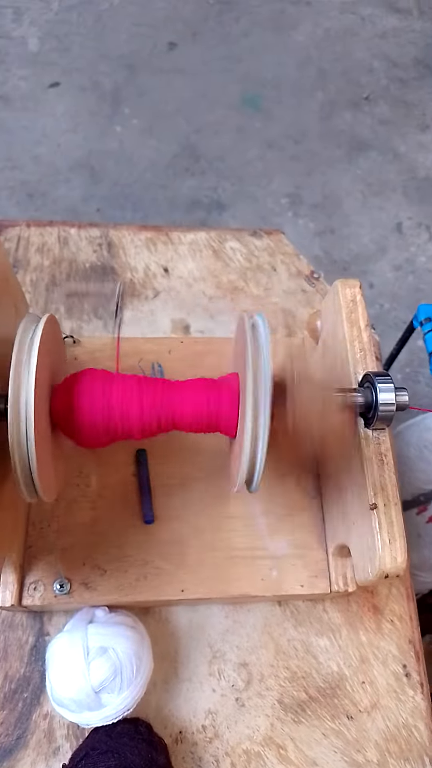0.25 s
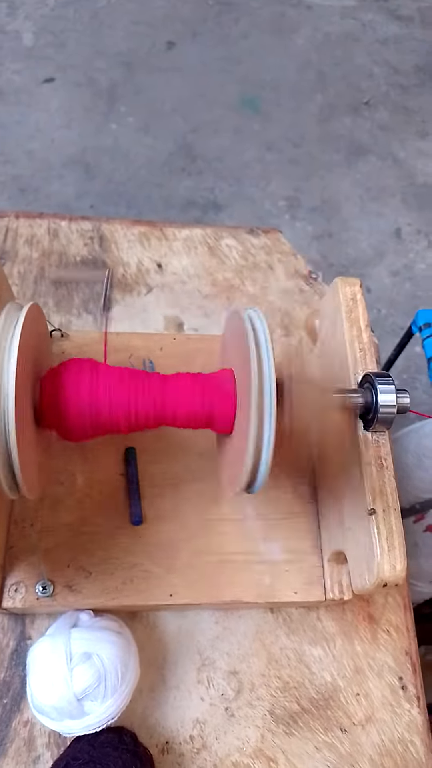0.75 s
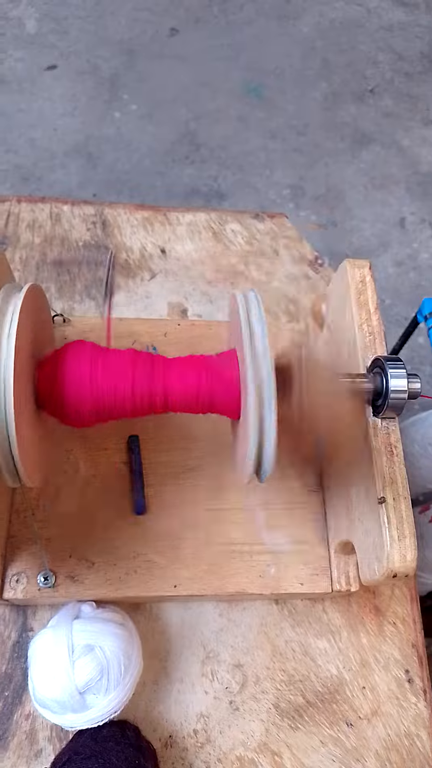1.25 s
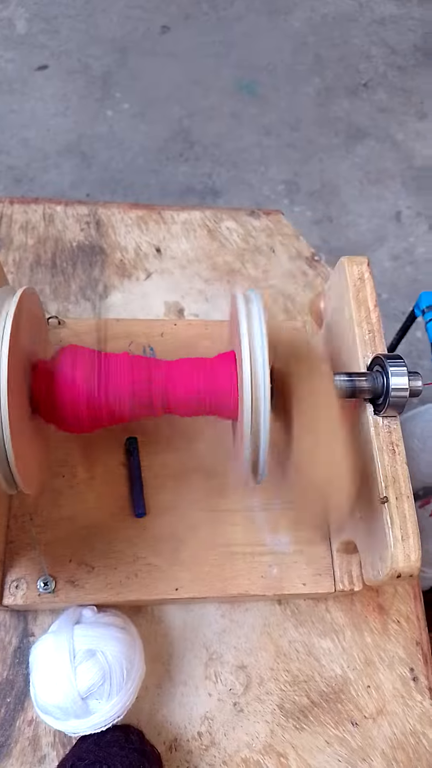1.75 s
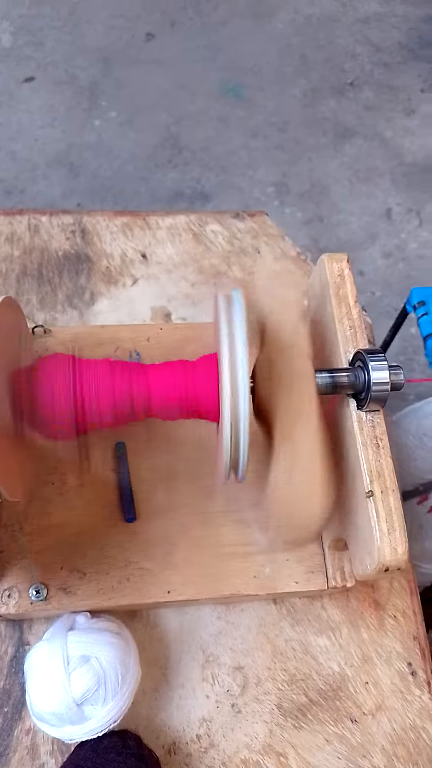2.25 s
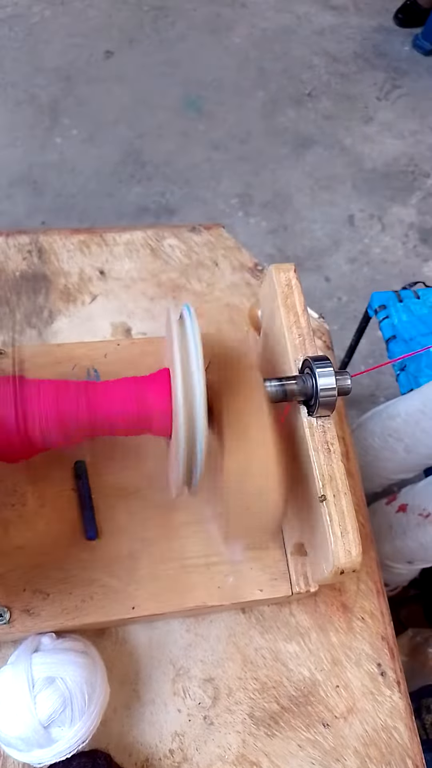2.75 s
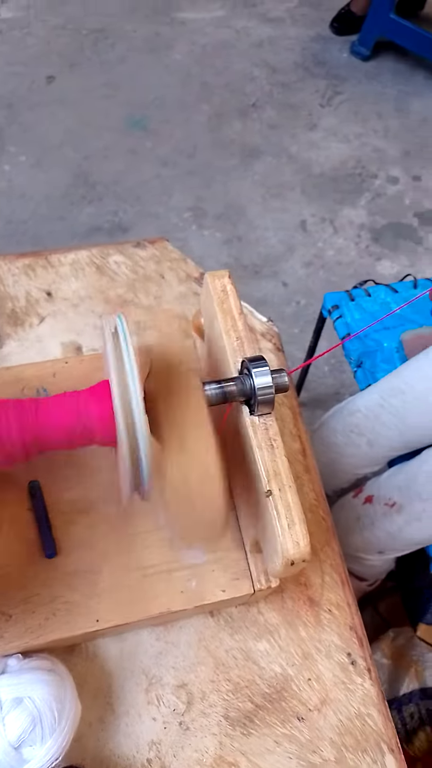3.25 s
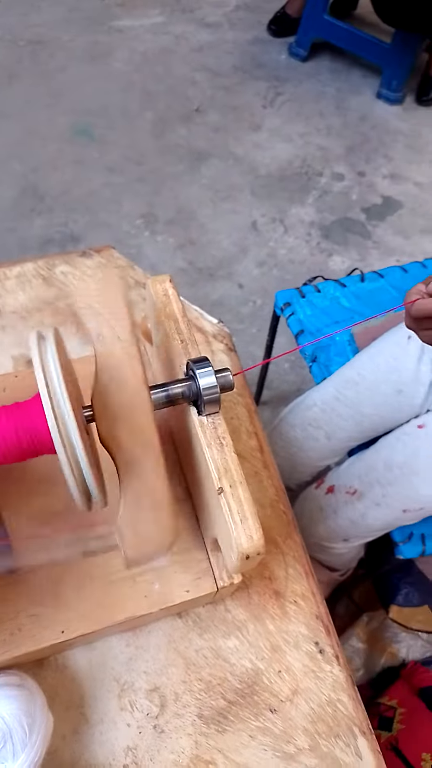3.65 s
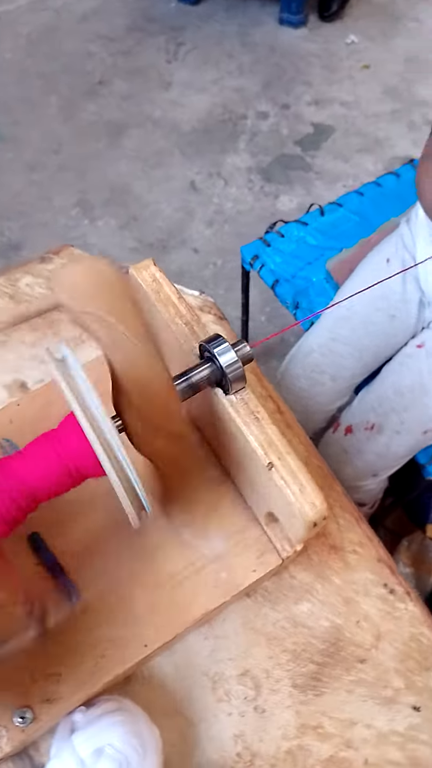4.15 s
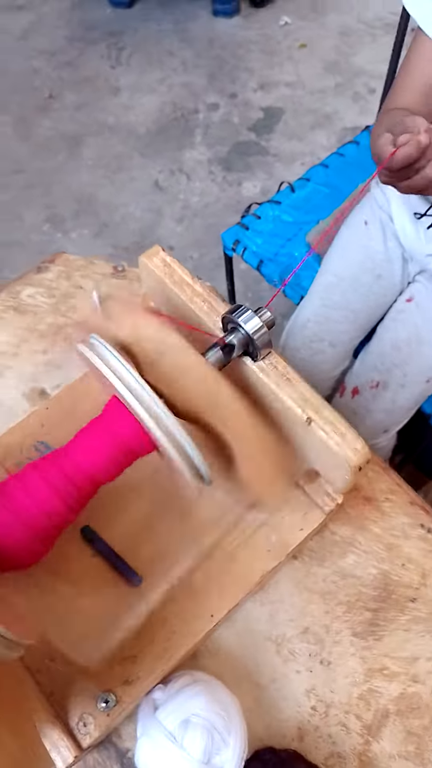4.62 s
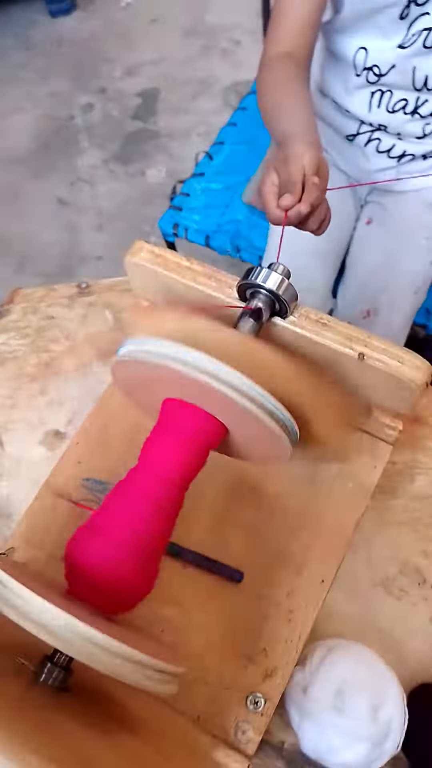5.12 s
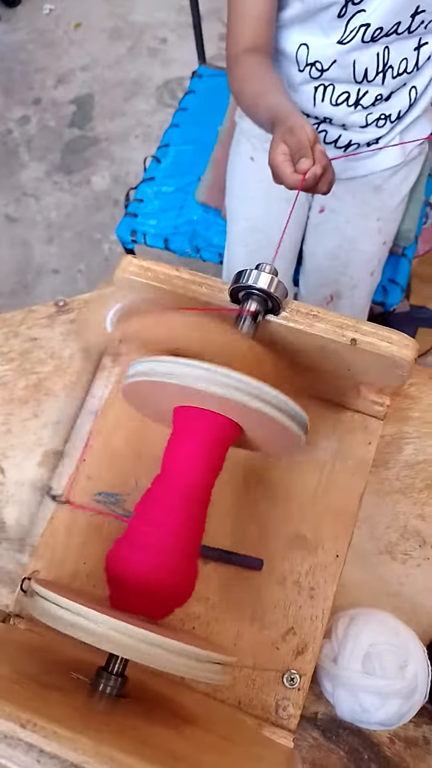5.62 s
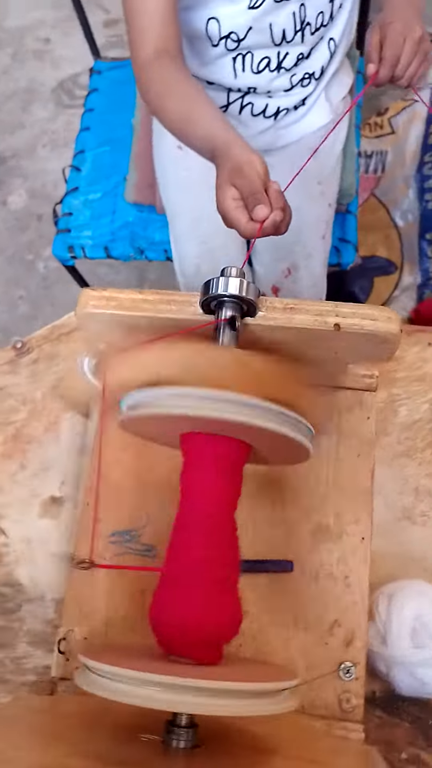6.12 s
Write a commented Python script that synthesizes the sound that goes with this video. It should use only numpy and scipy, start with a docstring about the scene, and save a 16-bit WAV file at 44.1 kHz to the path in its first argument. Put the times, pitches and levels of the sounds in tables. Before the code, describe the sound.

Continuous close whirring from a motorised yarn spinner: a nasal, rattling whine flutters rapidly in pitch, squealing near two kilohertz on each slowdown. Sharp brush hiss opens with a tiny flare and later becomes more prominent as the microphone swings round from above to the end. Irregular clicks from the turning wooden flyer and a low table rumble sit underneath. Dry, little room sound, cut off while still running.

```python
"""A motor whine slides down again and again and catches into squeals, over hiss that opens with a short flare.
A small brush motor drives the wooden flyer of a yarn spinner on a table: commutator and poles ring the frame.
An uneven belt and the unbalanced flyer and bobbin drag the motor down, moving the whine through resonances.
Brushes hiss, the flyer ticks and the table top rumbles as shaped noise.
The microphone moves from above the bobbin round to its end."""
import sys
import numpy as np
from scipy import signal
from scipy.fft import rfft, irfft, next_fast_len
from scipy.io import wavfile
from scipy.ndimage import uniform_filter1d, map_coordinates

SR = 44100
rng = np.random.default_rng(int(sys.argv[2]) if len(sys.argv) > 2 else 0)


def file_out(sig):
    """Save sig as 16-bit WAV at sys.argv[1]."""
    # one column per channel
    cols = np.atleast_2d(sig).T
    # limit, then scale
    lim = np.clip(cols, -1, 1)
    pcm = np.round(lim * 32767).astype(np.int16)
    wavfile.write(sys.argv[1], SR, pcm)


N = 281358
TIME = np.arange(N) / SR  # s

# harmonics of the shaft rate: ten commutator bars give multiples of ten, the two poles their neighbours
# column: f/shaft rate
MULTIPLES = [14, 16, 18, 20, 22, 24, 30, 50, 52]
# relative levels of those harmonics before load and frame act on them; column: level/dB
WHINE_DB = [-13, -18, -5, 0, -15, -17, -14, -8, -14]


def motor(turns, speed, place, bite, end_rattle_db=3, pole_db=-2.0, bite_db=6, calm_db=4,
          linger=0.0077, surge_db=0.44, brake_db=0.8, end_pulley_db=4.5):
    """Forced vibration: bar harmonics and pole-pulsed rattle ring the frame; load clears the whine."""
    load = np.interp(TIME - linger, TIME, bite) / bite.max()
    loose = amp(-calm_db * load)
    pressed_db = bite_db * load + surge_db * surge(speed) + brake_db * unit(braking(speed))
    # the pulley's swell is heard from the side
    pressed_db += end_pulley_db * np.minimum(place, 1) * pulley(peak_s=0.049)
    pressed = amp(pressed_db)

    whine = np.zeros(N)
    for multiple, db in zip(MULTIPLES, WHINE_DB):
        unsteady_level = 1 + .14 * wobble(150)
        phase = 2 * np.pi * multiple * turns + .08 * wobble(120)
        # load strengthens the bar harmonics and calms the pole neighbours
        grip = loose if multiple % 10 else pressed
        whine += np.sqrt(2) * amp(db) * unsteady_level * np.sin(phase) * grip

    pole_pulse_db = pole_db * np.cos(4 * np.pi * turns)
    rattle = unit(rng.standard_normal(N) * amp(pole_pulse_db + 2.64 * wobble(300)))
    rattle_gain = amp(15.5 + end_rattle_db * place / 2) * np.sqrt(loose)
    drive = whine + rattle_gain * rattle
    return blend([unit(coloured(drive, frame(side))) for side in (0, 1, 2)], place)


# resonances of motor case and wooden frame, with relative peak levels before the bass cut
# columns: f/Hz, width/Hz, level from above/dB, level oblique/dB, level from the end/dB
FRAME = [(557, 62, -7.5, -10, -13), (906, 207, -10.5, -10, -8.5), (1128, 39, 0, 3.5, -2),
         (1184.6, 78.6, 6, -2.5, -30), (1381, 155, -6.5, 0.5, -3), (1572, 63, -20, -3, -3),
         (1804, 174, -7.5, -9.5, -5), (2560, 1070, -15.5, -13.5, -16.5), (3010, 260, -9.5, -19.5, -11),
         (3273, 250, -32, -6.5, -0.5), (3490, 240, -7, -19, -6.5), (3977, 225, -14, -14, -11.5)]


def frame(column, low_hz=300):
    """Modal resonance: summed peaks heard from one side, on a body too small to radiate bass."""
    def gain(hz):
        power = 0
        for centre, width, *dbs in FRAME:
            offset = (hz - centre) / width
            power = power + amp(2 * dbs[column]) / (1 + 2 * offset ** 2) ** 2
        bass_cut = hz ** 2 / (hz ** 2 + low_hz ** 2)
        return np.sqrt(power) * bass_cut
    return gain


# unbalanced bobbin and flyer (second row: flyer); their unequal rates make the drags beat
# columns: f/Hz (turns a second), speed sag/(rev/s), t/s when the heavy side is up
ROTORS = [(12.07, 1.06, 0.039), (11.93, 1.031, 0.024)]
# places where the uneven belt binds, seven to a lap
# columns: position/lap, speed sag before the lap mean is removed/(rev/s)
TIGHT_SPOTS = [(0.046, 6.134), (0.197, 8.238), (0.341, 6.29), (0.45, 8.86), (0.591, 7.01), (0.738, 6.26),
               (0.901, 3.476)]
BELT_HZ, BIND_S = 2.504, 0.01966  # laps a second; Gaussian half-width of each bind
# cruising speed of the motor as the pull on the yarn changes; columns: t/s, speed/(rev/s)
CRUISE = [(0.0, 63.3), (0.37, 65.0), (0.5, 63.7), (0.9, 64.8), (1.22, 63.4), (1.96, 63.1), (2.17, 64.7),
          (2.87, 63.9), (3.01, 62.7), (3.22, 66.2), (3.8, 61.7), (4.38, 65.9), (4.61, 64.0), (4.65, 64.0),
          (5.39, 61.8), (5.69, 65.7), (6.05, 62.8), (6.38, 63.4)]
FLUTTER_REV_S, FLUTTER_RATE = .5, 25  # chance unevenness: scale in rev/s, knots a second


def shaft_speed():
    """Load torque lowers shaft speed: rev/s less the drag of tight spots, flyer and bobbin."""
    cruise, = curves(CRUISE)
    belt = np.zeros(N)
    for share, sag in TIGHT_SPOTS:
        # time to the nearest pass of this spot
        away_s = ((TIME * BELT_HZ - share + .5) % 1 - .5) / BELT_HZ
        belt += sag * np.exp(-.5 * (away_s / BIND_S) ** 2)
    unbalance = sum(sag * np.cos(2 * np.pi * hz * (TIME - s)) for hz, sag, s in ROTORS)
    return cruise - (belt - belt.mean()) - unbalance + FLUTTER_REV_S * wobble(FLUTTER_RATE)


def surge(speed, size=5000):
    """Speed fluctuation: rev/s above the mean over the tenth of a second or so around each moment."""
    return speed - uniform_filter1d(speed, size=size)


CATCH_LAG_S = 0.0045


def braking(speed):
    """Deceleration: rev/s lost per second, as the rubbing parts feel it a moment later."""
    return np.interp(TIME - CATCH_LAG_S, TIME, -np.gradient(speed) * SR)


def pulley(peak_s):
    """Periodic modulation: a cosine at the drive pulley's rate, seven turns in a lap of the belt."""
    return np.cos(2 * np.pi * len(TIGHT_SPOTS) * BELT_HZ * (TIME - peak_s))


def squeal(turns, speed, bite, rough=0.038, edge_hz=1955, skirt_hz=22):
    """Resonance capture: three times the bar rate sings once it has slid into the case resonance."""
    multiple = MULTIPLES[6]  # three times ten bars
    caught = 1 / (1 + np.exp((multiple * speed - edge_hz) / skirt_hz))
    tone = np.sqrt(2) * np.sin(2 * np.pi * multiple * turns + rough * wobble(200))
    return bite * caught * (1 + rough * wobble(190)) * tone


# squeal when fully gripped at the usual speed, its growth per rev/s lost, its gain at the bobbin's end
SQUEAL_DB, USUAL_REV_S, SQUEAL_DB_PER_REV_S, SQUEAL_END_DB = -29, 64.3, 0.57, 3.5
CATCH_BRAKING, CATCH_SOFTNESS = 15, 82  # braking at half grip, softness of the threshold; rev/s per s


def strain(speed, place):
    """Friction threshold: squeal amplitude catches under braking and grows as the speed drops."""
    grip = (1 + np.tanh((braking(speed) - CATCH_BRAKING) / CATCH_SOFTNESS / 2)) / 2
    slowing_db = SQUEAL_DB_PER_REV_S * (USUAL_REV_S - speed)
    return grip * amp(SQUEAL_DB + slowing_db + SQUEAL_END_DB * place / 2)


# spectra of the brush hiss at the three microphone places, as relative levels
# columns of each: f/Hz, level/dB per Hz
HISS_ABOVE = [(3500, -36), (4400, -39), (4900, -27), (5300, -20), (5700, -1), (6200, -16.5), (6850, 5),
              (7400, 1), (8600, 8), (9400, -0.5), (10100, 3), (10900, -16.5), (12000, -22.5), (15700, -24)]
HISS_OBLIQUE = [(2530, -53.5), (4300, -12.5), (5060, -23.5), (5340, -14), (5890, -14), (6670, -3),
                (8470, -8), (9030, 2.5), (10000, -7.5), (10600, -13.5), (12600, -15.5), (15700, -19.5)]
HISS_END = [(2530, -58), (4300, -8), (5520, -13), (6390, -11), (6670, -10), (7000, -14), (7470, -5),
            (7850, -2), (8650, 1.5), (9640, 6.5), (10100, 5.5), (11300, -6.5), (12800, -0.5), (14000, -12),
            (15700, -8.5)]


def brushes(turns, speed, place, turn_db=2, pulley_db=0.4, speed_db=0.25, ease_db=0.96,
            catch_rate=380, catch_size=1.31, catch_t60=0.014):
    """Sliding friction: noise with sudden catches swells with turns and speed, and eases under braking."""
    swell_db = turn_db * np.cos(2 * np.pi * turns) + pulley_db * pulley(peak_s=0.034)
    swell_db += speed_db * (speed - speed.mean()) - ease_db * unit(braking(speed))
    sizes = np.minimum(rng.exponential(size=N), 2)
    catches = (rng.random(N) < catch_rate / SR) * (catch_size * sizes) ** 2
    # each catch adds power that falls 60 dB in catch_t60 seconds
    power = 1 + signal.lfilter([1], [1, -amp(-120 / (catch_t60 * SR))], catches)
    scrape = mirrored(rng.standard_normal(N) * np.sqrt(power) * amp(swell_db), place)
    spectra = (HISS_ABOVE, HISS_OBLIQUE, HISS_END)
    return blend([unit(coloured(scrape, shape(points))) for points in spectra], place)


# near boards that mirror the hiss; columns: delay from above/ms, delay from the end/ms, gain/1
BOARDS = [(1.099, 0.94, 0.18), (2.9, 2.5, 0.11), (4.701, 2.8, 0.34)]


def mirrored(x, place):
    """Comb filtering: weak delayed copies off the boards shift as the microphone moves."""
    samples = np.arange(N)
    total = x
    for above, end, gain in BOARDS:
        delay = (above + (end - above) * place / 2) * SR / 1000
        total = total + gain * np.interp(samples - delay, samples, x)
    return total


# louder single ticks, several from the flyer's other arm
# columns: t/s, level/dB (peak, before the 3 dB lift and the colouring)
TICKS = [(0.2458, -8), (0.7328, -10), (2.6735, -5), (2.7582, -7), (2.8425, -7), (2.93, -10), (3.0113, -7),
         (3.0958, -9), (3.63, -8), (3.8104, -7), (3.9683, -6), (4.9947, -5), (6.0274, -5), (6.092, -5)]
# spectrum of every tick; columns: f/Hz, level/dB
TICK_COLOUR = [(700, -42), (2000, 1), (3600, 5), (4800, -8), (6000, 2), (8500, -1.5), (10500, 9.5),
               (12000, -22), (16000, -17)]
# one tick a flyer turn: mean and scatter in dB (as for the single ticks), s after the heavy side is up
TURN_TICK_DB, TURN_TICK_SCATTER_DB, TURN_TICK_LAG_S = -19.5, 8, 0.0089


def ticks():
    """Impulsive excitation: short dry snaps, of chance strength on flyer turns, plus louder single ticks."""
    hz, _, heavy_s = ROTORS[1]
    times = np.arange(heavy_s + TURN_TICK_LAG_S, N / SR, 1 / hz)
    each_turn = zip(times, rng.normal(TURN_TICK_DB, TURN_TICK_SCATTER_DB, len(times)))
    t = np.arange(SR // 50) / SR
    snaps = np.zeros(N + len(t))
    for s, db in [*each_turn, *TICKS]:
        snap = rng.standard_normal(len(t)) * amp(-60 * t / .009)  # falls 60 dB in 9 ms
        start = round(s * SR)
        snaps[start:start + len(t)] += amp(db + 3) * snap / abs(snap).max()
    return coloured(snaps[:N], shape(TICK_COLOUR))


# spectrum of the table top, as relative levels; columns: f/Hz, level/dB per Hz
TABLE = [(20, -46), (60, -48), (125, -22), (165, -18.5), (200, -7), (275, -1.5), (315, -6), (400, 2.5),
         (470, 1.5), (560, -2), (680, -5), (1000, -18), (2500, -35), (5000, -47)]


def table(bite, place, level_db=-42, end_db=-3, load_db=3, lumps_db=3.0):
    """Structure-borne sound: the machine shakes the table top, harder under load, loudest from above."""
    shake = amp(load_db * bite / bite.max() + lumps_db * wobble(70))
    rumble = unit(coloured(rng.standard_normal(N) * shake, shape(TABLE)))
    return amp(level_db + end_db * place / 2) * rumble


def amp(db):
    """Logarithmic level: decibels to amplitude gain."""
    return 10 ** (np.asarray(db) / 20)


def unit(x):
    """Effective value: x scaled to rms 1."""
    return x / np.sqrt(np.mean(x ** 2) + 1e-20)


def curves(rows):
    """Linear interpolation: one value per sample for each column after the time."""
    s, *cols = np.transpose(rows)
    return [np.interp(TIME, s, c) for c in cols]


def wobble(rate):
    """Band-limited chance: a smooth random curve with rate knots a second."""
    knots = rng.standard_normal(int(N * rate / SR) + 4)
    return map_coordinates(knots, [TIME * rate])


def shape(points):
    """Spectral envelope: gain against frequency, from (Hz, dB) points on a log axis."""
    f, db = np.transpose(points)
    return lambda hz: amp(np.interp(np.log(hz + 1), np.log(f), db))


def coloured(x, gain):
    """Minimum-phase filtering: x through a causal filter with the given gain against frequency."""
    m = 2 * next_fast_len(N // 2 + 8192)
    cepstrum = irfft(np.log(gain(np.fft.rfftfreq(m, 1 / SR)) + 1e-6))
    # folding the cepstrum onto positive time makes the filter causal
    cepstrum[1:m // 2] *= 2
    cepstrum[m // 2 + 1:] = 0
    return irfft(rfft(x, m) * np.exp(rfft(cepstrum)))[:N]


def blend(sounds, place):
    """Linear cross-fade: sounds numbered 0, 1, .. follow the moving place."""
    place = np.clip(place, 0, len(sounds) - 1)
    return sum(np.clip(1 - abs(place - k), 0, 1) * x for k, x in enumerate(sounds))


# path of the microphone; columns: t/s, place/1 (0 above, 1 oblique, 2 at the end of the bobbin)
PLACE = [(0, 0.04), (3.75, 0.093), (4.0, 0.54), (4.2, 0.68), (4.45, 0.706), (4.8, 1.03), (5.1, 1.73),
         (5.6, 1.93), (5.9, 1.95), (6.15, 1.82), (6.38, 1.75)]
# rms levels at those three places, the hiss before its flare; columns: motor level/dB, hiss level/dB
PLACE_DB = [(-20, -24), (-20.5, -16.5), (-23, -18.5)]
FLARE_DB, FLARE_S = 4, 0.084  # extra hiss at the start, s until it has gone


def scene():
    """Superposition: one shaft drives whine, squeal and hiss, summed with ticks and table rumble."""
    place, = curves(PLACE)
    motor_db, hiss_db = (blend(levels, place) for levels in np.transpose(PLACE_DB))
    flare_db = FLARE_DB * np.clip(1 - TIME / FLARE_S, 0, 1)
    speed = shaft_speed()
    turns = np.cumsum(speed) / SR
    bite = strain(speed, place)
    whine = amp(motor_db) * motor(turns, speed, place, bite)
    singing = squeal(turns, speed, bite)
    hiss = amp(hiss_db + flare_db) * brushes(turns, speed, place)
    return (whine + singing + hiss + ticks() + table(bite, place))[None]


TOP_HZ = 15750  # band limit of the recorder


def record(dry):
    """Saturation and band limiting: the recorder rounds off high peaks and stops at its band limit."""
    held = dry / (1 + (dry / .7) ** 6) ** (1 / 6)
    m = next_fast_len(N + SR // 2)
    passed = np.fft.rfftfreq(m, 1 / SR) < TOP_HZ
    return irfft(rfft(held, m) * passed, m)[:, :N]


dry = scene()
out = record(dry)
file_out(out)
```